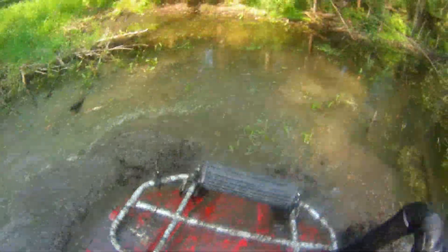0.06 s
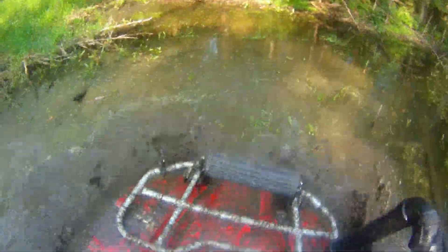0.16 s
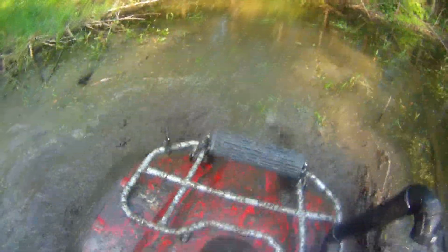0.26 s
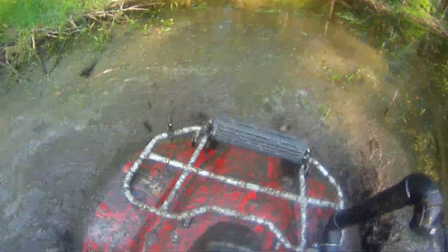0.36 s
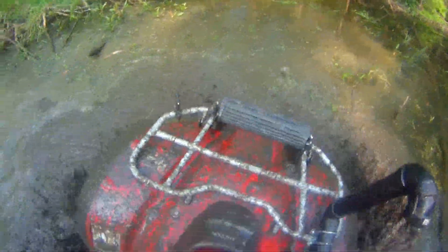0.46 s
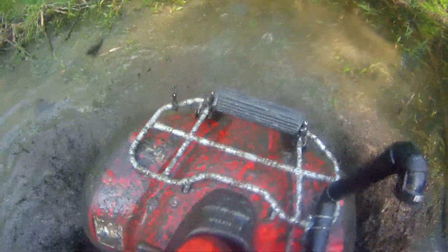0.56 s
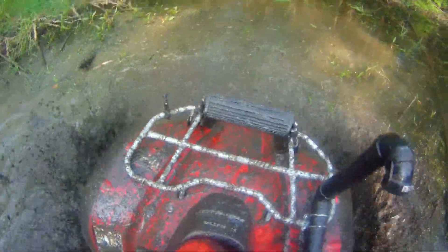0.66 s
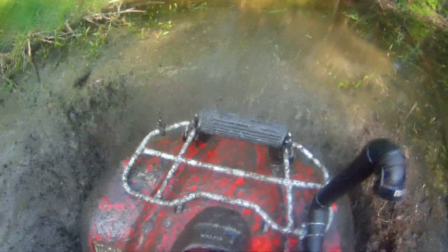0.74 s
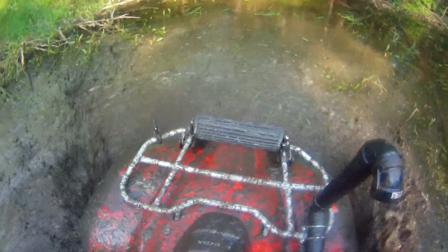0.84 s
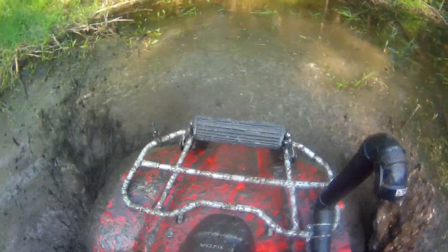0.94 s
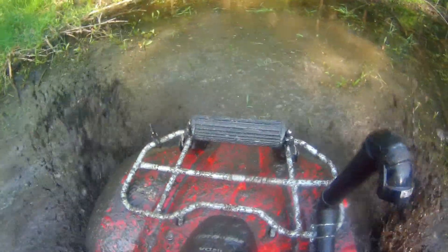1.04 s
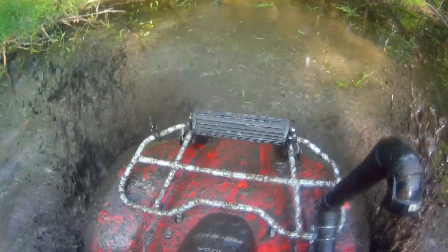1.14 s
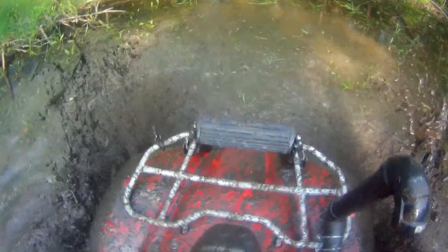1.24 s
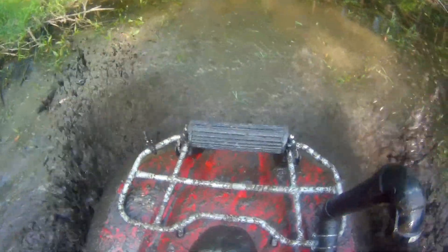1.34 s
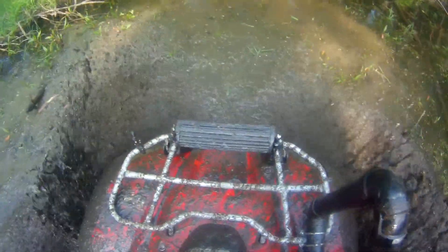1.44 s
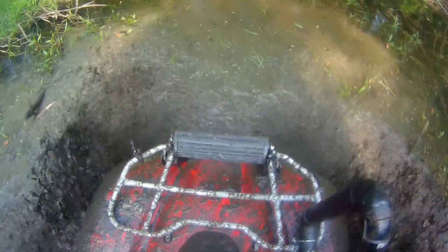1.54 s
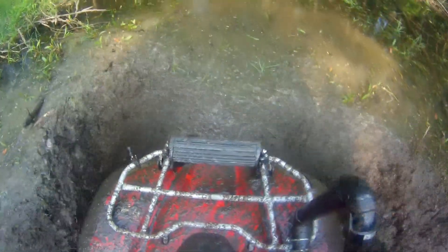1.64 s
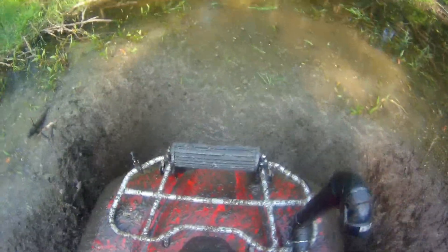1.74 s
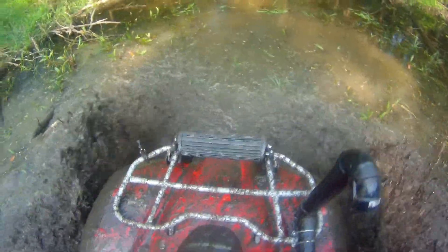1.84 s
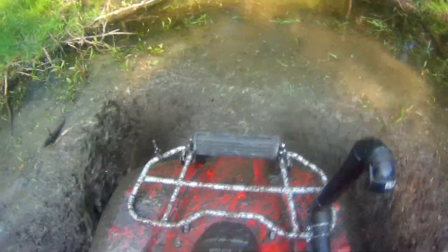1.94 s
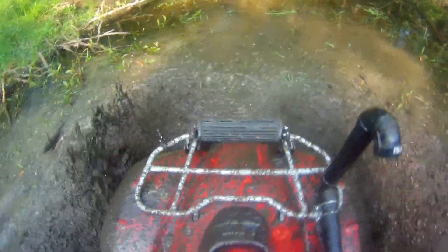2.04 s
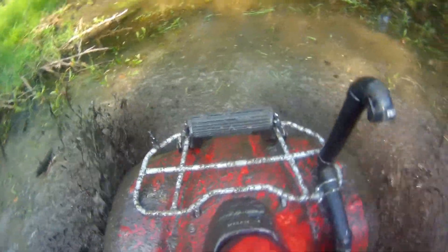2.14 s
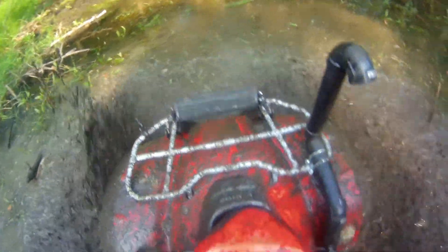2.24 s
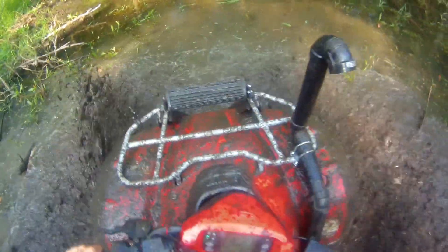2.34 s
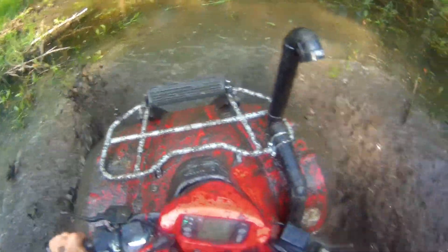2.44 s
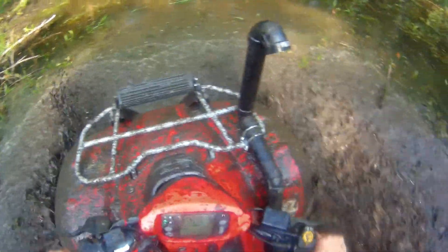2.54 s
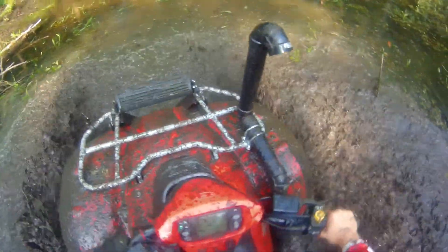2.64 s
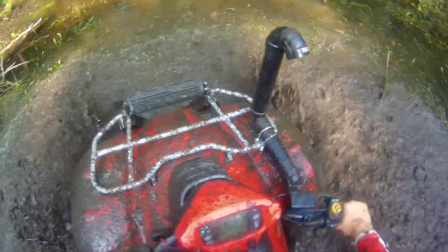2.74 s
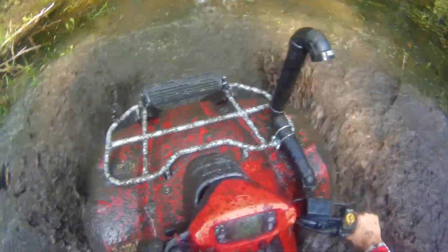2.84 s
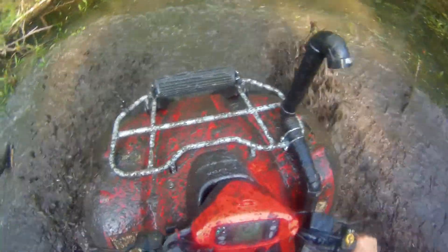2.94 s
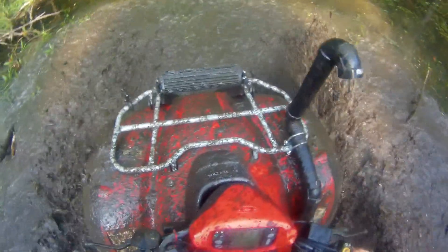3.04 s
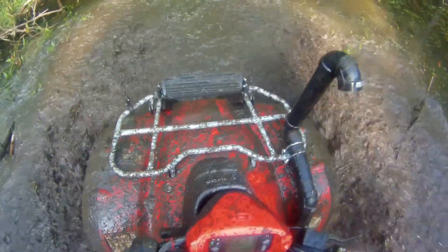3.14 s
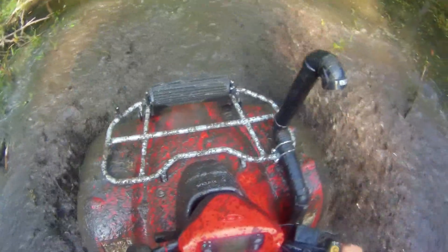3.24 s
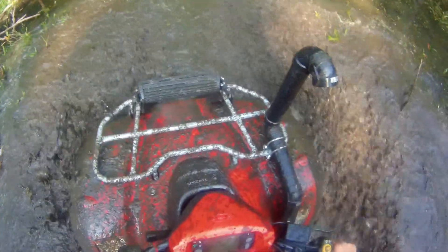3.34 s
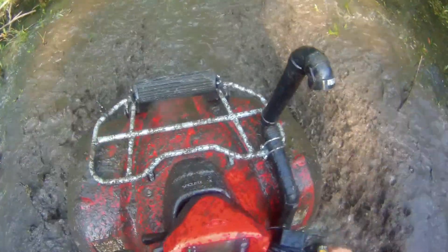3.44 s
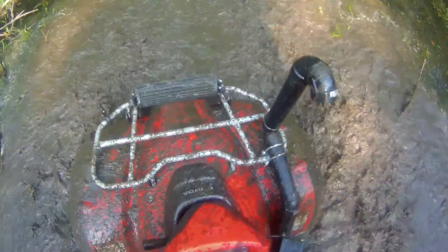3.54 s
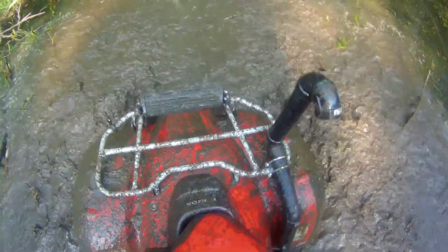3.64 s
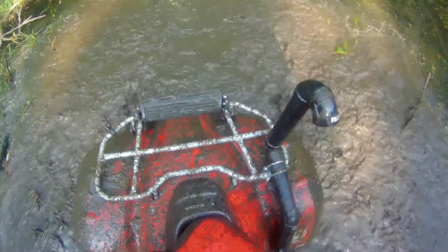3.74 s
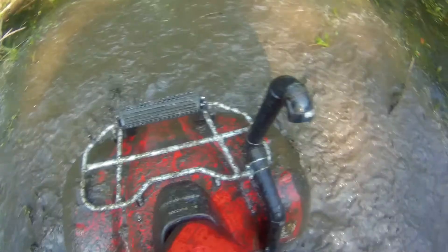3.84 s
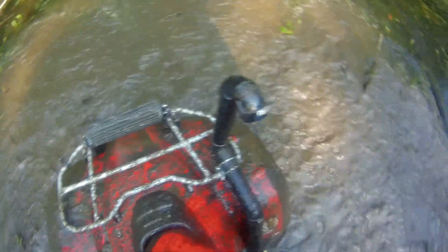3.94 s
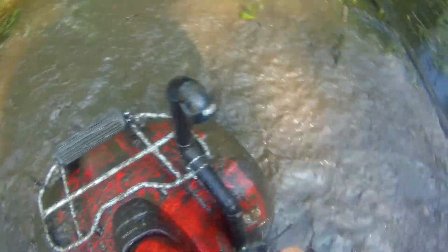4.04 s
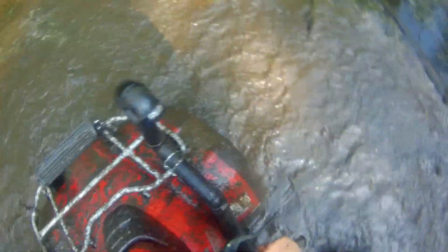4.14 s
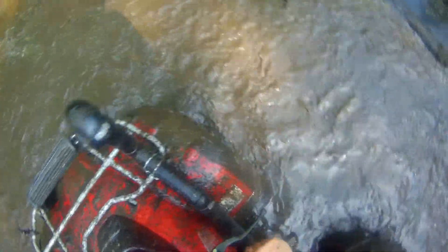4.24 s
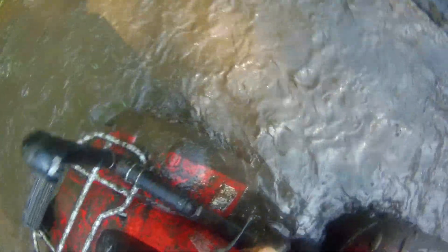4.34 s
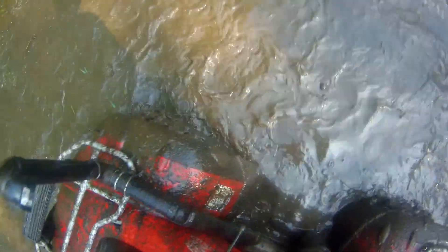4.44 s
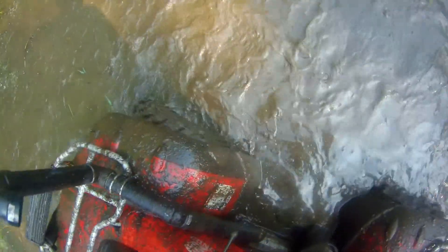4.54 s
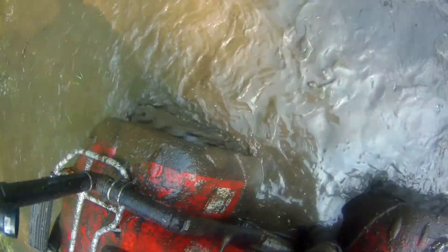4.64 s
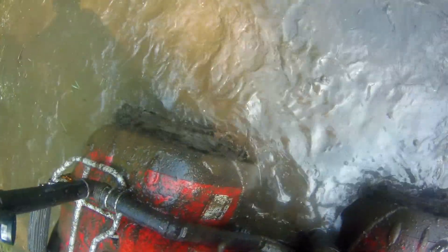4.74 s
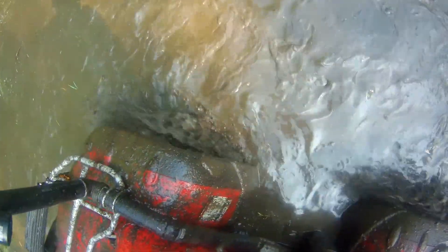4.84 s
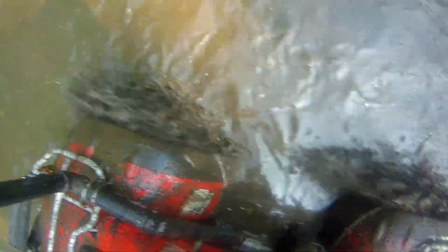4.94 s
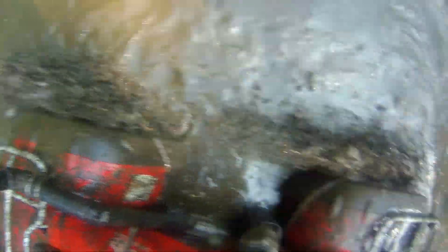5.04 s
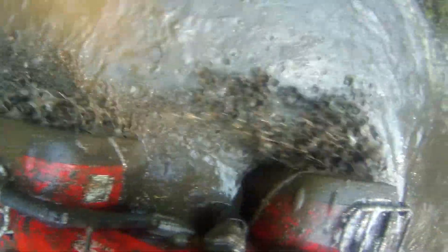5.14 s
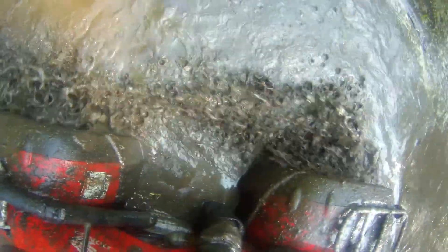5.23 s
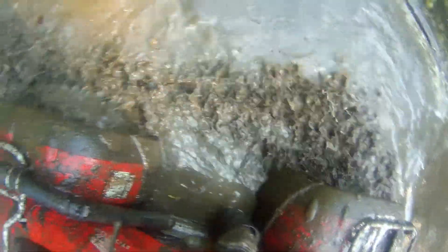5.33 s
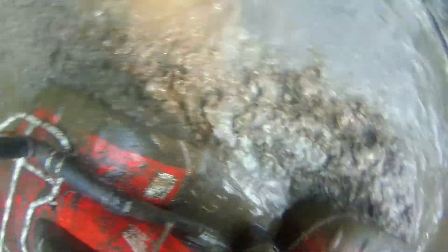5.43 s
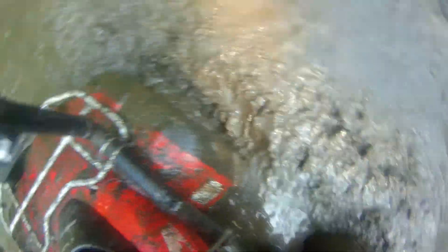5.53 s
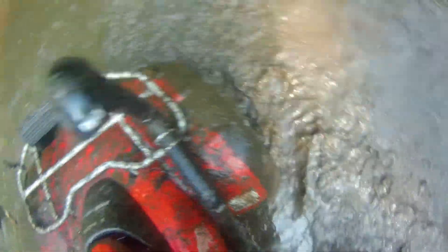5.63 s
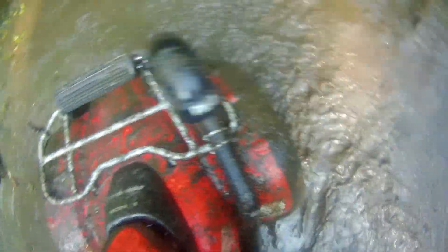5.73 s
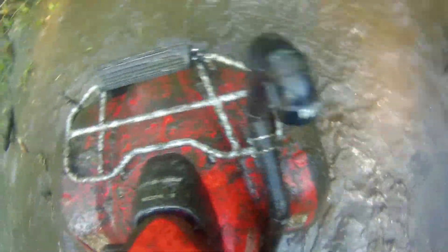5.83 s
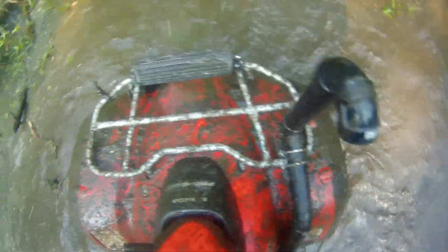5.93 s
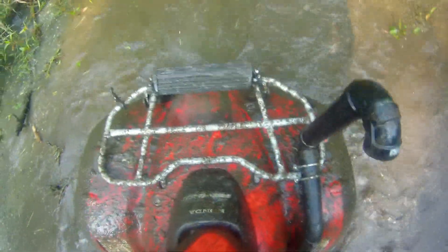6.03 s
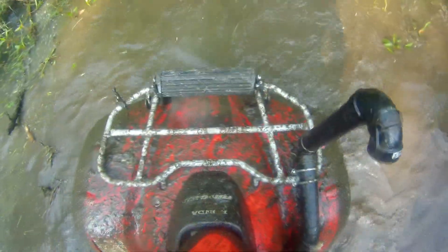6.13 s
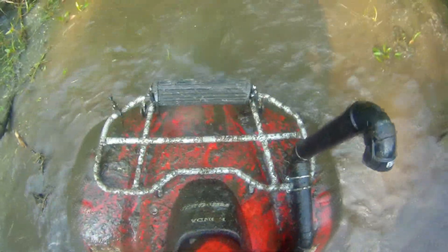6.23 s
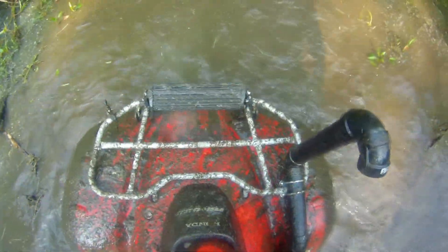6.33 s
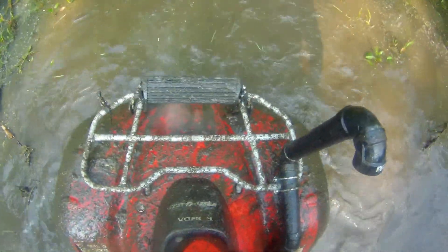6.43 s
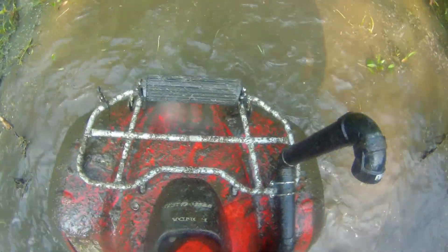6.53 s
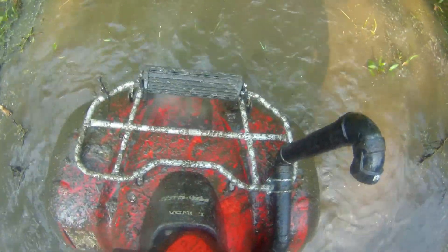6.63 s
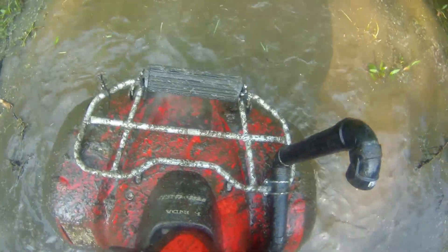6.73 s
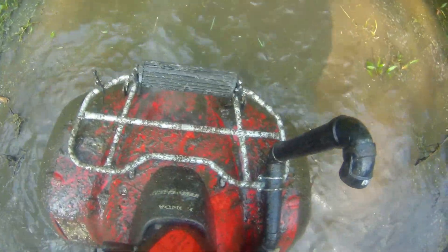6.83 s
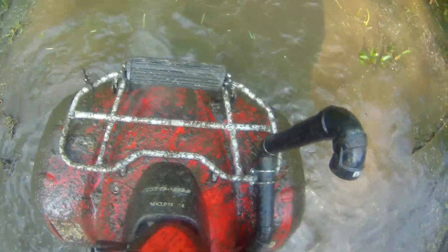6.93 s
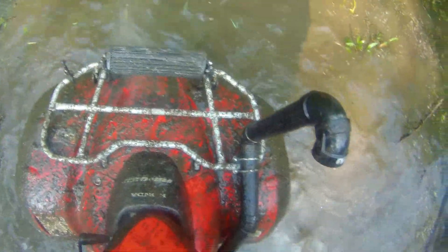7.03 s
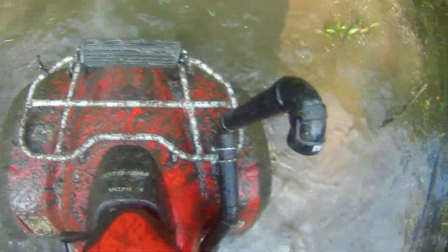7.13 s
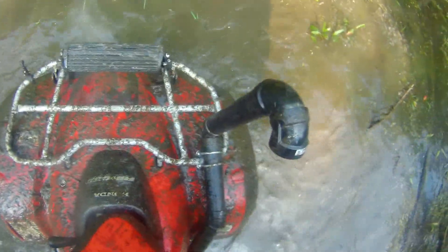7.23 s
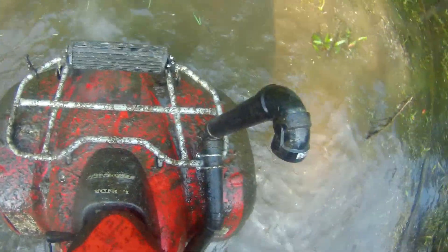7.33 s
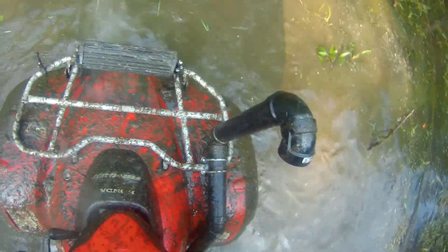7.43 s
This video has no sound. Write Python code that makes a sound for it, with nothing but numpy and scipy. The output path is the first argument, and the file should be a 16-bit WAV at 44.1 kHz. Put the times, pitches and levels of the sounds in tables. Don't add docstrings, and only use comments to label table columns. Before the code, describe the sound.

Steady raspy quad engine roar with rattling panels and hissing mud spray, then falling revs, splattering clods, short throttle blips and a slow thumping idle.

```python
import sys
import numpy as np
from scipy import signal
from scipy.fft import rfft, irfft, next_fast_len
from scipy.io import wavfile
from scipy.ndimage import uniform_filter1d

SR = 44100
rng = np.random.default_rng(int(sys.argv[2]) if len(sys.argv) > 2 else 0)


def wav_out(sig):
    wavfile.write(sys.argv[1], SR, np.round(np.clip(np.atleast_2d(sig).T, -1, 1) * 32767).astype(np.int16))


def voltage_ratio(level):
    return 10 ** (np.asarray(level, float) / 20)


N = 329868
FULL_SPEED = 40


def evened(x):
    return x / np.sqrt(np.mean(x ** 2) + 1e-20)


def drift(shape, *sizes):
    x = rng.standard_normal(shape)
    for size in sizes:
        x = uniform_filter1d(x, size=size)
    return evened(x)


# (frequency [Hz], width [Hz],
# level over the base [dB])
HISS_HUMPS_AND_DIPS = [(420, 43, 5.5), (1210, 62, 9.5), (1312, 61, 10), (1636, 79, 11.5), (1804, 68, 6.5),
                       (1955, 70, 8), (2334, 180, 7), (2580, 710, -5.5), (4300, 980, 3.5), (5250, 2220, -9),
                       (6140, 180, 2), (8600, 2440, -5.5), (10700, 3200, 3.5), (13900, 1200, -8)]


def colour(x, spectrum, housing_share):
    length = next_fast_len(N)
    hz = np.fft.rfftfreq(length, 1 / SR)
    f, db = np.transpose(spectrum)
    shape_db = np.interp(np.log(hz + 1), np.log(f + 1), db)
    for centre, width, hump_db in HISS_HUMPS_AND_DIPS:
        shape_db = shape_db + housing_share * hump_db / (1 + (2 * (hz - centre) / width) ** 2)
    return irfft(rfft(x, length) * voltage_ratio(shape_db), length)[:N]


def hiss(spectrum, patchy_db, flicker_db, housing_share=1.0):
    frames = N // 128 + 5
    real, imaginary, patches = rng.standard_normal((frames, 257, 3)).T
    patches = uniform_filter1d(patches, size=6, axis=0)
    patches = evened(uniform_filter1d(patches, size=14, axis=1))
    level_db = patchy_db * patches + flicker_db * drift(frames, 5)
    x = signal.istft((real + 1j * imaginary) * voltage_ratio(level_db), nperseg=512, noverlap=384)[1][:N]
    return evened(colour(x, spectrum, housing_share))


# (time [s], speed the engine heads for [cycles per s], settling time [s])
SPEED_CHANGES = [(0, 39.58, .205), (.42, 44.36, 1.434), (1.022, 40.17, .418), (1.375, 41.43, .666),
                 (1.755, 34.61, 1.783), (2.646, 39.71, .312), (3.053, 15.58, .123), (3.534, 20.4, .05),
                 (3.855, 11.18, .217), (4.283, 34.19, .223), (4.904, 15.07, .128), (5.111, 8.64, .089),
                 (5.741, 31.98, .586), (5.99, 22.6, .042), (6.286, 8.18, .318), (6.69, 12.99, .3),
                 (7.136, 9.24, .092)]


def speed():
    start_speed, flywheel_s = 36.7, .06
    s, goal, settle = np.transpose(SPEED_CHANGES)
    start = [start_speed]
    for lasts, g, u in zip(np.diff(s), goal, settle):
        start.append(g + (start[-1] - g) * np.exp(-lasts / u))
    t = np.arange(N) / SR
    k = np.searchsorted(s, t, side="right") - 1
    still_to_go = (np.array(start) - goal)[k] * np.exp((s[k] - t) / settle[k])
    return uniform_filter1d(goal[k] + still_to_go, round(flywheel_s * SR), mode="nearest")


def crank():
    rate = speed()
    cycles = .52 + np.cumsum(rate) / SR
    return cycles, rate, np.flatnonzero(np.diff(np.floor(cycles)) > 0)


# (start [s], end [s], load at start [0-1], load at end [0-1])
HARD_PULLS = [
    (0, 3.5, 0.09, 0.17),
    (3.55, 3.2, 0, 0),
    (4.42, 4.92, 0.52, 0.73),
]


def labour():
    rise_s, fall_s = .2, .06
    t = np.arange(N) / SR
    pulls = (np.interp(t, [a - rise_s, a, b, b + fall_s], [0, u, v, 0]) for a, b, u, v in HARD_PULLS)
    return np.clip(sum(pulls), 0, 1)


# (start [s], closing time [s], reopening starts [s], share shut [0-1])
THROTTLE_CLOSINGS = [
    (3.07, 0.11, 3.45, 0.08),
    (4.92, 0.27, 5.76, 1),
    (6.4, 0.43, 7.15, 0.43),
    (7.15, 0.12, 7.5, 1),
]


def throttle():
    reopen_s = 0.18
    t = np.arange(N) / SR
    shut = [np.interp(t, [a, a + close, b, b + reopen_s], [0, deep, deep, 0])
            for a, close, b, deep in THROTTLE_CLOSINGS]
    return np.clip(1 - np.max(shut, axis=0), 0, 1)


# (time [s], combustion level [dB], intake gulp level [dB])
ENGINE_EFFORT = [(0, -34.5, -34.5), (.45, -39, -34), (1.05, -30, -35), (1.6, -32.5, -35), (2.2, -38, -34.5),
                 (3.12, -35.5, -34), (3.27, -48.5, -44), (3.78, -42, -38), (4.16, -65.5, -50),
                 (4.42, -32.5, -34), (4.96, -30.5, -37.5), (5.19, -51, -52.5), (5.68, -66, -62),
                 (6.05, -37.5, -39), (6.28, -44.5, -42), (6.55, -59, -51.5), (7.08, -57, -50.5),
                 (7.3, -68, -59)]


def effort():
    s, bark_db, gulp_db = np.transpose(ENGINE_EFFORT)
    t = np.arange(N) / SR
    return np.interp(t, s, bark_db), np.interp(t, s, gulp_db)


def follow(law):
    db, effort_share, speed_share, load_db = law
    effort_db = np.minimum(effort()[0] + 39, 0)
    speed_db = 20 * np.log10(speed() / FULL_SPEED)
    return db + effort_share * effort_db + speed_share * speed_db + load_db * labour()


def share_db(share):
    return 10 * np.log10(np.clip(share, 1e-3, 1))


def rung(modes, level_db, delay_s, rise_s, uneven_db, jitter_s, exhaust):
    cycles, rate, gulps = crank()
    t, out = np.arange(9000) / SR, np.zeros(N)
    energy = sum(voltage_ratio(2 * db) for hz, t60, db in modes)
    size = voltage_ratio(level_db[gulps]) * np.sqrt(SR / rate[gulps] / energy)
    half_turn = np.round(SR / rate[gulps] / 2).astype(int)
    for hz, t60, db in modes:
        ring = voltage_ratio(-60 * t / t60) * np.sin(2 * np.pi * hz * t) * (1 - np.exp(-t / rise_s))
        timing, gulp_luck, exhaust_luck, swell = rng.standard_normal((len(gulps), 4)).T
        swell = evened(uniform_filter1d(swell, size=14, mode="wrap"))
        flare = size * voltage_ratio(1.08 * uneven_db * swell)
        at = gulps + np.round((delay_s + jitter_s * timing) * SR).astype(int)
        gulp_hit = flare * voltage_ratio(0.47 * uneven_db * gulp_luck)
        exhaust_hit = -exhaust * flare * voltage_ratio(1.1 * uneven_db * exhaust_luck)
        train = np.zeros(N)
        np.add.at(train, np.clip(at, 0, N - 1), gulp_hit)
        np.add.at(train, np.clip(at + half_turn, 0, N - 1), exhaust_hit)
        out += voltage_ratio(db) * signal.oaconvolve(train, ring / np.linalg.norm(ring))[:N]
    return out


# (frequency [Hz], time to die away by 60 dB [s], level [dB])
CRANKCASE_MODES = [(39.4, 0.17, 3.1), (80, 0.1, 2.5)]
# (level at full speed [dB], share of effort [dB per dB], share of speed [dB per dB], change at full load [dB])
THROB_CONTROL = (-44.5, 0.7, 2.9, -15)


def throb():
    return -rung(CRANKCASE_MODES, follow(THROB_CONTROL) - 2.5, delay_s=.0058, rise_s=.008,
                 uneven_db=.8, jitter_s=.0002, exhaust=.05)


# (frequency [Hz], time to die away by 60 dB [s], level [dB])
AIR_BOX_OPEN_MODES = [(110, 0.49, -13.5), (118.6, 0.12, 2.5), (164.3, 0.027, -4)]
AIR_BOX_SHUT_MODES = [(96, .22, 0), (108, .1, -7)]


def intake(thump_db):
    opening = throttle()
    high = rung(AIR_BOX_OPEN_MODES, thump_db + share_db(opening), delay_s=0.0058, rise_s=0.025,
                uneven_db=0.96, jitter_s=.0001, exhaust=0.021)
    low = rung(AIR_BOX_SHUT_MODES, thump_db + share_db(1 - opening), delay_s=.0052, rise_s=.005,
               uneven_db=.7, jitter_s=.0001, exhaust=.08)
    return -high - low


# (frequency [Hz], time to die away by 60 dB [s], level [dB])
PIPE_OPEN_MODES = [(200.5, 0.04, -3), (261.5, 0.13, -16.5), (284.2, 0.066, 4.5), (378.6, 0.11, 1.5),
                   (427.3, 0.15, 1.5), (474, 0.059, -7), (572, 0.022, -5.5), (722.5, 0.14, -14),
                   (925, 0.12, -10)]
PIPE_SHUT_MODES = [(226, 0.076, 1.5), (316, 0.058, 0.5), (392, 0.11, 5.5), (600, 0.027, -8)]


def pipe(bark_db):
    opening = throttle() ** 2.3
    sharp = rung(PIPE_OPEN_MODES, bark_db + share_db(opening), delay_s=0.005554, rise_s=0.0014,
                 uneven_db=1.8, jitter_s=.00005, exhaust=0.2)
    soft = rung(PIPE_SHUT_MODES, bark_db + share_db(1 - opening), delay_s=0.005, rise_s=0.01,
                uneven_db=2.5, jitter_s=0.000085, exhaust=0.23)
    echo = np.roll(sharp, round(0.00831 * SR))
    second_echo = np.roll(echo, round(0.00813 * SR))
    return sharp + 0.38 * echo + 0.11 * second_echo + soft


# (frequency [Hz], time to die away by 60 dB [s], level [dB])
PANEL_MODES = [(1186, 0.023, -3.5), (1291, 0.094, -1.5), (1657, 0.056, -4), (1731, 0.13, -8),
               (1855, 0.056, -17), (2444, 0.076, -9), (3450, 0.0017, -15.5), (4600, 0.053, -38)]


def panels(rattle_db, load, rate):
    coasting_db = -2 * (1 - load) * (1 - rate / FULL_SPEED)
    return -rung(PANEL_MODES, rattle_db - 5 + coasting_db, delay_s=.0072, rise_s=.0015,
                 uneven_db=2, jitter_s=.00005, exhaust=.45)


# (frequency [Hz], time to die away by 60 dB [s], level [dB])
TAPPET_MODES = [(4630, 0.11, 4), (3780, 0.031, -16)]


def tappet(thump_db):
    return rung(TAPPET_MODES, thump_db - 30, delay_s=.011, rise_s=.003, uneven_db=3, jitter_s=.001, exhaust=.3)


# (multiple of the cycle rate, level relative to the rattle [dB])
MESH_TONES = [(17, -16.5), (18, -12.5), (24, -14.5), (30, -12.5), (32, -23)]


def mesh(cycles, rate, rattle_db):
    out = np.zeros(N)
    for order, db in MESH_TONES:
        waver = drift(N, 5000, 5000)
        out += voltage_ratio(db + 2 * waver) * np.sin(2 * np.pi * round(order) * cycles + waver)
    return voltage_ratio(rattle_db) * (rate / FULL_SPEED) ** 5 * out


# (frequency [Hz], width [Hz], level [dB], share of the thump level it follows [dB per dB])
SINGING_PANEL_TONE = (2445, 38, -45, .5)


def singing(thump_db, puff):
    centre, width, db, follows = SINGING_PANEL_TONE
    off = 2 * (np.fft.rfftfreq(N, 1 / SR) - centre) / width
    drive = rng.standard_normal(N) * (.7 + puff)
    return voltage_ratio(db + follows * thump_db) * evened(irfft(rfft(drive) / (1 + off ** 2), N))


# (frequency [Hz], level [dB])
CLATTER_SPECTRUM = [(60, -53), (200, -12.5), (500, -14), (900, -15.5), (1500, -12.5), (2600, -11),
                    (3600, -13.5), (5000, -21.5), (8000, -28), (16000, -82)]


def clatter(load, puff, strength):
    surge = .75 - .35 * load + (.5 + 1.3 * load) * puff
    return hiss(CLATTER_SPECTRUM, patchy_db=1.5, flicker_db=.3) * surge * strength


# (frequency [Hz], level [dB])
CRACK_SPECTRUM = [(300, -27), (1200, -9), (2600, -10), (3700, 5.5), (5000, -6), (6300, 1), (8500, -32),
                  (11000, -15.5), (16000, -44)]


def crack(load, since_s, strength):
    burst = np.exp(-since_s / .008) * (1 - np.exp(-since_s / .003)) * strength
    return load * burst * hiss(CRACK_SPECTRUM, patchy_db=2, flicker_db=.5)


# (level at full speed [dB], share of effort [dB per dB], share of speed [dB per dB], change at full load [dB])
RATTLE_CONTROL = (-32, .55, 2.5, 6.5)


def engine():
    cycles, rate, gulps = crank()
    load = labour()
    bark_db, gulp_db = effort()
    lift_db = -4.5 * np.minimum((1 - throttle()) / 0.14, 1)
    bark_db = bark_db + lift_db
    caking_db = -2 + 2 * np.exp(-np.arange(N) / SR / 0.9)
    rattle_db = follow(RATTLE_CONTROL) + lift_db + caking_db
    thump_db = gulp_db - 7 * load

    since_s = ((cycles - .0062 * rate) % 1) / rate
    puff = np.exp(-since_s / .014) * (1 - np.exp(-since_s / .002))
    strength = voltage_ratio(0.46 * rng.standard_normal(len(gulps) + 2))[cycles.astype(int)]

    rings = throb() + intake(thump_db) + pipe(bark_db) + panels(rattle_db, load, rate) + tappet(thump_db)
    tones = mesh(cycles, rate, rattle_db) + singing(thump_db, puff)
    rattle = voltage_ratio(rattle_db - 2.0) * clatter(load, puff, strength)
    cracks = voltage_ratio(0.75 * rattle_db - 2.0) * crack(load, since_s, strength)
    return rings + tones + rattle + cracks


# (start [s], end [s], level at start [dB], level at end [dB], dying away [dB per s])
MUD_THROWS = [
    (0, 3.05, -47.5, -42.5, 48),
    (4.45, 4.9, -50.5, -39, 50),
    (6.04, 6.1, -59.5, -57.5, 24),
]
# (peak time [s], level [dB], swelling [dB per s], dying away [dB per s])
MUD_LANDINGS = [
    (3.47, -40, 4.5, 36.5),
    (5.39, -39, 50, 68),
]


def mud_level():
    rise_db_per_s, drip_db = 96, -72
    t = np.arange(N) / SR
    power = voltage_ratio(2 * drip_db)
    for a, b, first_db, last_db, fall in MUD_THROWS:
        levels_db = [first_db - rise_db_per_s, first_db, last_db, last_db - 2 * fall]
        power = power + voltage_ratio(2 * np.interp(t, [a - 1, a, b, b + 2], levels_db))
    for s, db, rise, fall in MUD_LANDINGS:
        power = power + voltage_ratio(2 * (db - np.maximum((s - t) * rise, (t - s) * fall)))
    return np.sqrt(power)


# (frequency [Hz], level [dB])
WATER_SPECTRUM = [(180, -35), (300, -15), (990, -8), (1830, -5), (2230, -7.5), (2470, -1.5), (2680, -4.5),
                  (6040, -5.5), (8270, -16.5), (10800, -15), (15800, -35)]


def spray():
    thrown = 1 - .7 * labour()
    size = voltage_ratio(2.5 * np.minimum(rng.exponential(1, N), 5))
    falls = rng.random(N) < 1500 / SR
    drops = size * falls * rng.choice([-1, 1], N)
    patter = evened(colour(drops, WATER_SPECTRUM, 1.0))
    fizz = hiss(WATER_SPECTRUM, patchy_db=-1.0, flicker_db=1.2, housing_share=0.79)
    return voltage_ratio(2.5) * mud_level() * thrown * (fizz + voltage_ratio(-9.5) * patter)


# (frequency [Hz], level [dB])
WIND_SPECTRUM = [(10, -31), (20, -2), (32, -11), (50, -15), (80, -12), (200, -18), (600, -55)]
MARSH_SPECTRUM = [(110, -28), (180, -5), (395, -1.5), (1150, -9), (1280, -12), (1460, -12.5), (1670, -10.5),
                  (2920, -21), (11600, -31), (15700, -39)]
# (level at full speed [dB], share of effort [dB per dB], share of speed [dB per dB], change at full load [dB])
RUMBLE_CONTROL = (-44.5, 0.34, -0.3, 13)


def air():
    lumps = voltage_ratio(2 * drift(N, 4000, 4000))
    wind = evened(colour(rng.standard_normal(N) * lumps, WIND_SPECTRUM, 0))
    marsh = hiss(MARSH_SPECTRUM, patchy_db=1.2, flicker_db=.3, housing_share=.3)
    return voltage_ratio(follow(RUMBLE_CONTROL) - 4.5) * wind + voltage_ratio(-57.5) * marsh


# (time [s], peak level [dB], frequency [Hz], ring time [s])
MUD_SPLATS = [
    (4.1704, -42, 10700, .0012),
    (5.3558, -25, 2550, 0.0031),
    (5.454, -33, 1880, 0.0053),
]


def splats():
    out, t = np.zeros(N), np.arange(2000) / SR
    for s, db, hz, ring_s in MUD_SPLATS:
        shape = t / ring_s * 3 * np.exp(1 - t / ring_s * 3)
        wander = .6 * drift(len(t), 40)
        out[round(s * SR):][:len(t)] += voltage_ratio(db) * shape * np.sin(2 * np.pi * hz * t + wander)
    return out


# (start [s], length [s], frequency [Hz], level [dB], wing beats [per s])
INSECT_BUZZ = (6.537, .041, 10300, -66, 260)


def insect():
    s, length, hz, db, beats = INSECT_BUZZ
    t = np.arange(N) / SR - s
    on = np.clip(np.minimum(t, length - t) / .003, 0, 1)
    wobble = .8 * np.sin(2 * np.pi * 95 * t)
    throbbing = 1 + .3 * np.sin(2 * np.pi * beats * t)
    return voltage_ratio(db) * on * throbbing * np.sin(2 * np.pi * hz * t + wobble)


def scene():
    return (engine() + spray() + air() + splats() + insect())[None]


def top_cut(x):
    return signal.sosfilt(signal.butter(12, 16150, fs=SR, output="sos"), x)


def record(dry):
    edge = signal.firwin(4001, [12, 15760], pass_zero=False, window=("kaiser", 7), fs=SR)
    mix = signal.oaconvolve(dry, edge[None], "same")
    return top_cut(mix)


dry = scene()
out = record(dry)
wav_out(out)
```